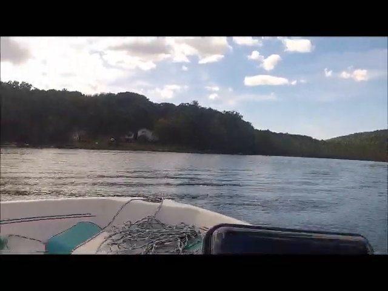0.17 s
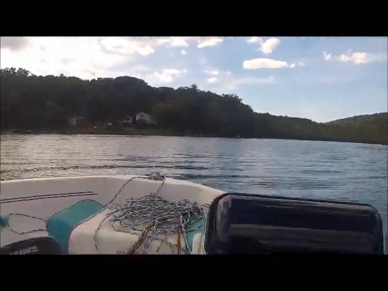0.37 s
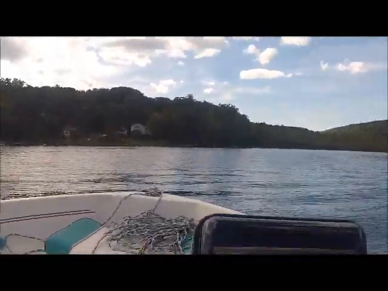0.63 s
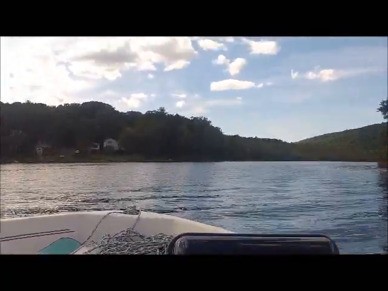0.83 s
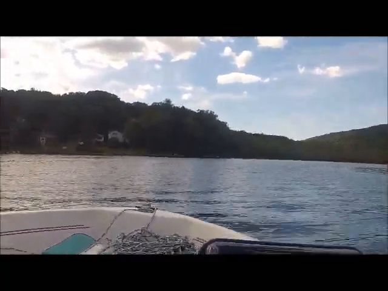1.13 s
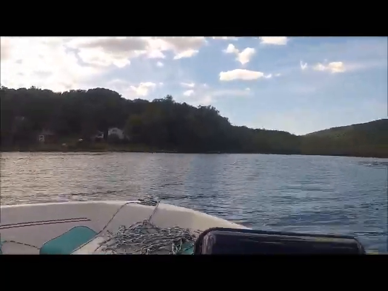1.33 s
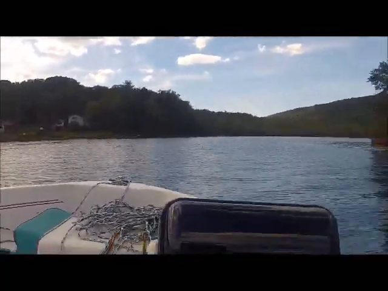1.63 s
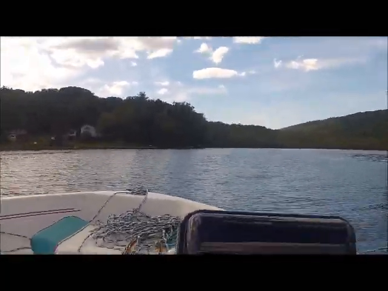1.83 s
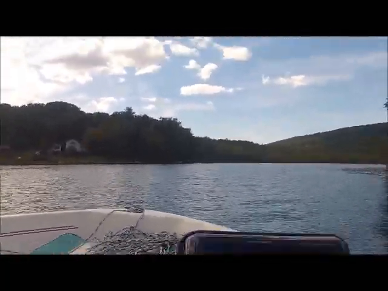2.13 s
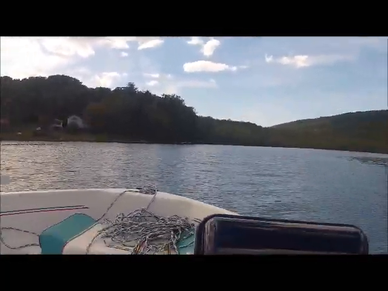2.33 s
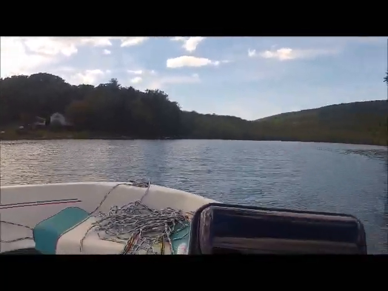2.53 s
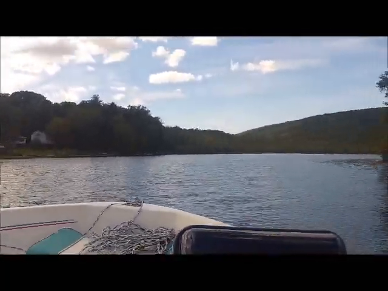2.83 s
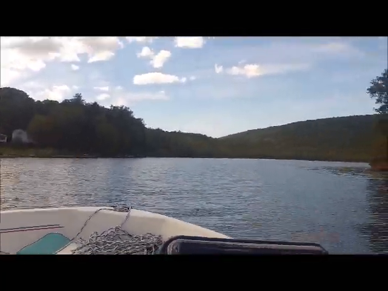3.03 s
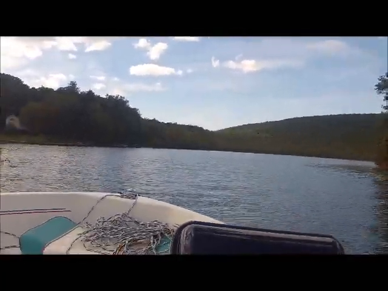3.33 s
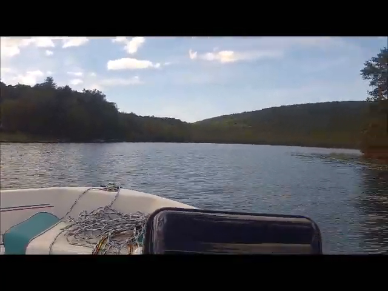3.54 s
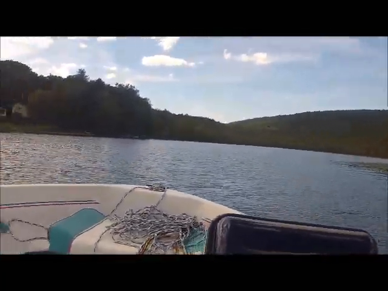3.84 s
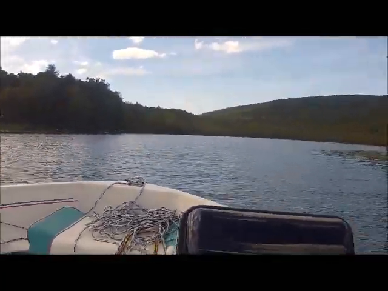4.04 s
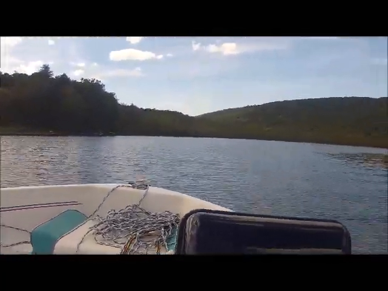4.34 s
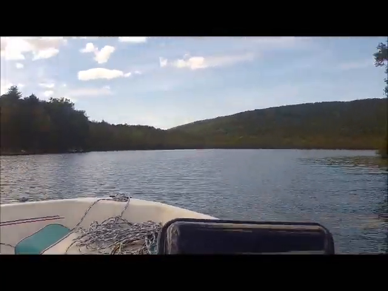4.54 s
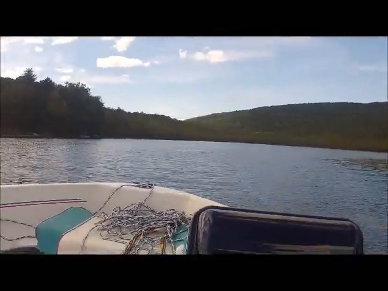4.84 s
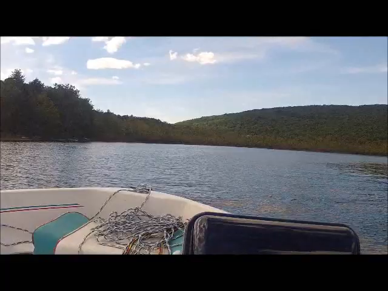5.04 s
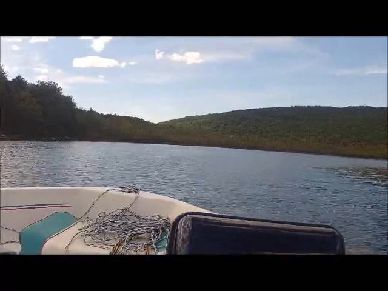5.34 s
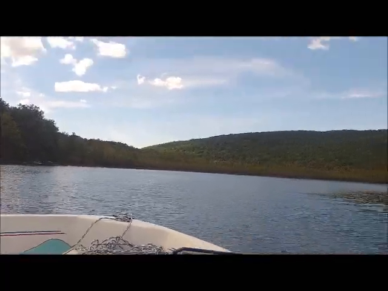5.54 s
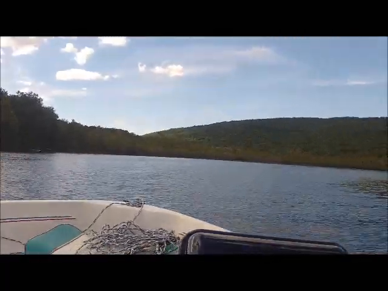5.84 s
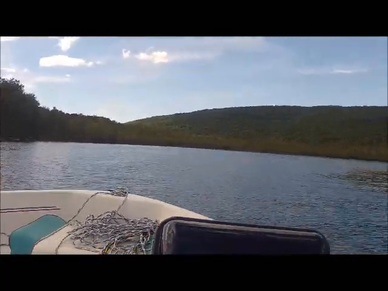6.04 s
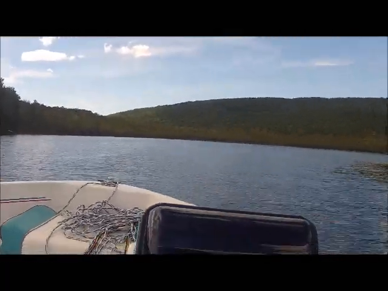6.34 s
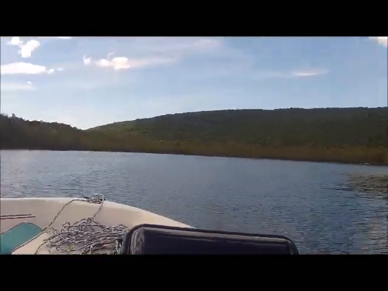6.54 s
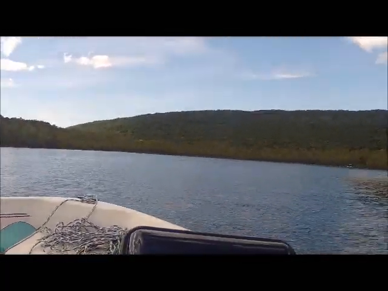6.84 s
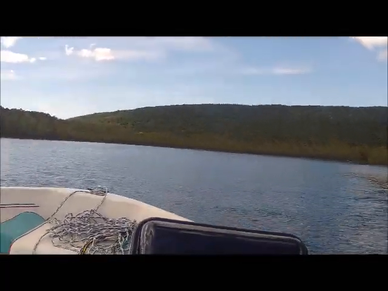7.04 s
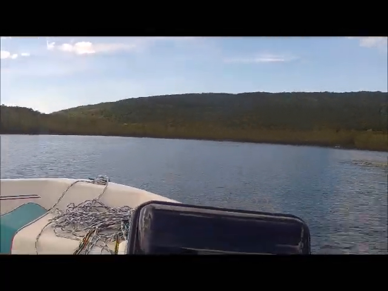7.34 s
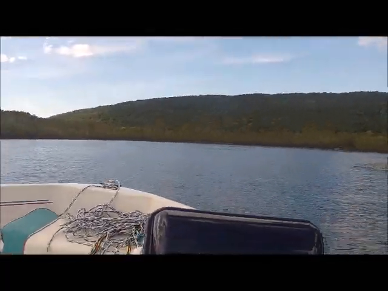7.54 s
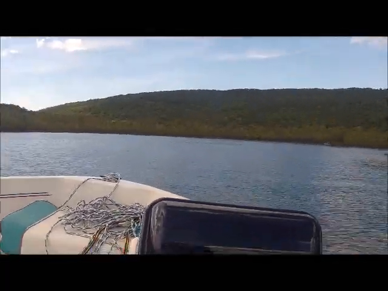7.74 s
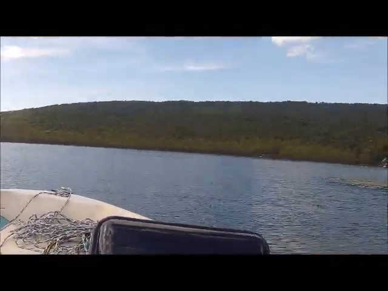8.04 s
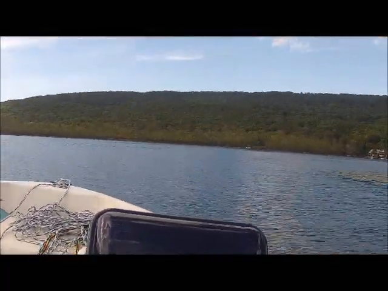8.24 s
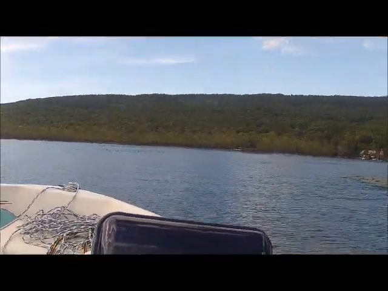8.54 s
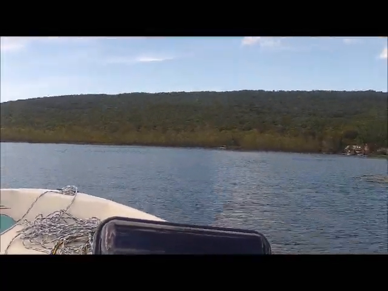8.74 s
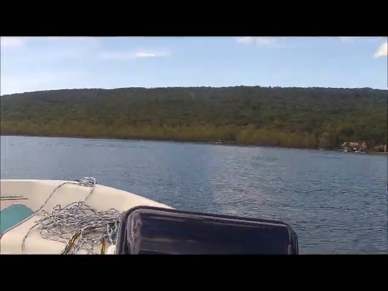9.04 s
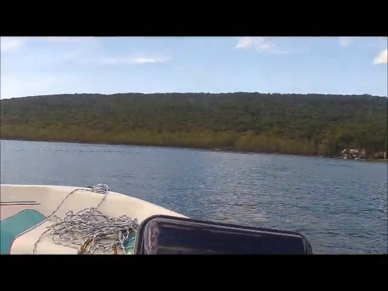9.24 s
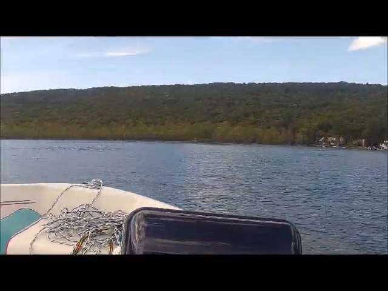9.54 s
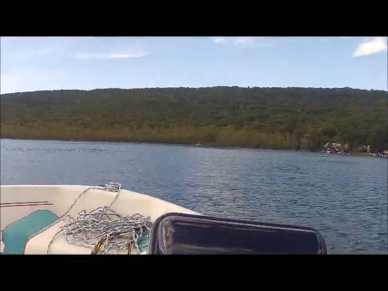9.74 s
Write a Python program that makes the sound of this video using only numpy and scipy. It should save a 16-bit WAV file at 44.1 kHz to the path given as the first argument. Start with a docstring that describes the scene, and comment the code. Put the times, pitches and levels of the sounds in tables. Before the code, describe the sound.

A small two-stroke boat engine drones steadily, heard on board, with exhaust burbling, a loose metal part rattling, hissing spray and low wind buffeting.

```python
"""On board a small boat under way, with its two-stroke engine turning at an almost even speed.
Wind buffets the microphone port and spray hisses: both are coloured noise, the spray with single drops.
A loose part buzzes, ticks and chinks, and clatter rings the resonances of the engine cowl.
Exhaust noise burbles with the crank, under a hum of cosines at multiples of the shaft rate.
The recorder's cheap converter holds each sample, so it mirrors the sound around its sampling rate."""
import sys
import numpy as np
from scipy import signal
from scipy.fft import rfft, irfft, next_fast_len
from scipy.io import wavfile
from scipy.ndimage import uniform_filter1d, map_coordinates

SR = 44100
rng = np.random.default_rng(int(sys.argv[2]) if len(sys.argv) > 2 else 0)


def master(y):
    """Save y as 16-bit WAV."""
    cut = np.clip(np.atleast_2d(y).T, -1, 1)
    pcm = np.round(cut * 32767)  # scale
    wavfile.write(sys.argv[1], SR, pcm.astype(np.int16))


N = 435689


def amp(db):
    """Gain of a level in dB."""
    return 10 ** (np.asarray(db) / 20)


def unit(x):
    """x at rms 1."""
    return x / np.sqrt(np.mean(x ** 2) + 1e-20)


def curves(rows):
    """One value per sample for each column after the time."""
    seconds, *columns = np.transpose(rows)
    t = np.arange(N) / SR
    return [np.interp(t, seconds, column) for column in columns]


def wobble(rate):
    """A smooth random curve through rate knots a second, at most 39."""
    position = np.arange(N) * min(rate, 39) / SR
    return map_coordinates(rng.standard_normal(400), [position], order=3)


def filtered(x, response):
    """x times a complex response of frequency, padded so that tails do not wrap."""
    size = next_fast_len(N + SR // 2)
    spectrum = rfft(x, size) * response(np.fft.rfftfreq(size, 1 / SR))
    return irfft(spectrum, size)[..., :N]


def colour(points):
    """Response through (frequency [Hz], level [dB]) points on a log axis."""
    f, db = np.transpose(points)
    return lambda hz: amp(np.interp(np.log(hz + 1), np.log(f + 1), db))


def resonances(modes):
    """Causal sum of resonances, neighbours in opposite phase."""
    def response(f):
        total = 0
        for k, (centre, width, db) in enumerate(modes):
            damping = 1j * f * width
            total = total + (-1) ** k * amp(db) * damping / (centre ** 2 - f ** 2 + damping)
        return total
    return response


def ticks(rate, spread_db, density):
    """Random impulses of uneven size and either sign, rate a second where density is 1."""
    happens = rng.random(N) < rate * density / SR
    size = np.minimum(rng.exponential(1, N), 3.5)
    sign = np.sign(rng.standard_normal(N))
    return unit(happens * sign * amp(spread_db * size))


def once_a_turn(angle, depth_db, twice_db, lag):
    """Noise that swells at each firing and again at the opposite stroke; lag in radians."""
    swell_db = depth_db * np.cos(angle - lag) + twice_db * np.cos(2 * (angle - lag))
    return rng.standard_normal(N) * amp(swell_db)


def evened(x, share):
    """Noise with a share of its own random swelling taken out."""
    envelope = np.abs(signal.hilbert(x, next_fast_len(N))[:N])
    return unit(x / (envelope + 0.36) ** share)


# Engine speed on the water: (time [s], crankshaft speed [turns/s])
SPEED = [(0.0, 73.24), (1.4, 73.31), (1.6, 73.19), (2.5, 73.21), (2.8, 73.1), (3.0, 73.14), (3.4, 72.98),
         (4.2, 73.13), (4.55, 73.05), (4.8, 73.1), (6.6, 73.11), (7.0, 73.01), (7.55, 72.97), (8.0, 72.65),
         (8.4, 72.82), (8.8, 72.81), (9.15, 72.6), (9.88, 72.63)]


def shaft():
    """Speed in turns a second, and the crank angle in radians with a slight unevenness."""
    speed, = curves(SPEED)
    even_angle = 2 * np.pi * np.cumsum(speed) / SR
    return speed, even_angle + 0.033 * wobble(9) + 0.0077 * wobble(30)


# Rattle level on board between the sharp knocks: (time [s], level [dB])
RATTLE = [(0.0, -45.5), (0.6, -47.5), (1.5, -42), (2.0, -46), (2.2, -40), (3.0, -42.5), (3.35, -40),
          (3.7, -43), (4.7, -41), (5.2, -42), (5.6, -40), (6.0, -42), (6.4, -42.5), (7.0, -41),
          (8.7, -41.5), (9.88, -41)]
# Sharpest knocks of the loose part: (time [s], level [dB])
CHINKS = [(0.115, -41.7), (0.166, -31.5), (0.304, -38), (0.422, -42.9), (0.544, -42), (0.632, -39),
          (0.777, -34), (0.9, -38), (0.968, -41), (1.158, -37), (1.328, -37), (1.577, -35), (1.951, -36),
          (2.221, -34), (2.319, -34), (2.499, -31), (3.393, -37.2), (3.638, -38.6), (3.842, -38),
          (3.997, -33), (4.049, -37), (4.681, -34.5), (5.395, -39.2), (5.488, -38), (5.624, -34),
          (5.762, -37), (6.28, -35), (6.484, -34), (6.936, -39), (7.135, -44.5), (7.193, -42.1),
          (7.312, -40), (7.509, -43), (7.654, -38), (8.221, -35), (8.461, -36), (8.791, -33)]
CHINK_S = 0.0064  # half length of a knock [s]
SWELL_DB, SWELLS_PER_S = 1.63, 9.8  # random swelling of the rattle: depth [dB], knots a second


def shaking():
    """Level of the rattle in dB: a slow drift, random swells and short sharp knocks."""
    t = np.arange(N) / SR
    drift_db, = curves(RATTLE)
    power = amp(drift_db + SWELL_DB * wobble(SWELLS_PER_S)) ** 2
    for s, db in CHINKS:
        near = slice(max(round((s - .05) * SR), 0), round((s + .05) * SR))
        power[near] += amp(db) ** 2 * np.exp(-((t[near] - s) / CHINK_S) ** 2)
    return 10 * np.log10(power)


# Gusts at the microphone port: (time [s], level [dB])
WIND = [(0.0, -31), (0.9, -35), (1.3, -37), (2.0, -31), (2.7, -36.5), (4.6, -33.5), (5.0, -36.5),
        (5.8, -35), (6.6, -32.5), (7.1, -34.5), (8.9, -36.5), (9.5, -42), (9.88, -39)]
# Tone of the wind lumps before the low-pass: (frequency [Hz], relative level [dB per Hz])
BUFFET = [(15, -30), (24, -17), (38, 2.5), (50, 2), (65, -17), (110, -16.5), (300, -58)]


def buffet():
    """Wind lumps on the microphone port: gusty noise kept below 140 Hz."""
    lumps = unit(filtered(rng.standard_normal(N), colour(BUFFET)))
    gust_db = curves(WIND)[0] + 1.7 * wobble(3.95)
    return filtered(amp(gust_db) * evened(lumps, share=0.34), lambda hz: hz < 140)


# Drift of the spray at the microphone, which the cowl follows: (time [s], level [dB])
TREBLE = [(0.0, -45), (1.0, -45), (1.95, -44.5), (2.2, -44.5), (3.4, -44), (4.1, -44.5), (4.7, -44),
          (5.6, -44), (6.2, -44.5), (8.8, -43), (9.88, -43)]
# Tone of the thrown water: (frequency [Hz], relative level [dB per Hz])
SPRAY = [(900, -25.5), (2000, -4), (2900, -5), (3150, 3), (3450, -1), (3650, 3), (3850, -2), (4100, -4.5),
         (4700, -8), (5350, -6), (5600, -11.5), (5800, -17), (5950, -35)]


def spray(angle, shake_db, treble_db):
    """Hiss of thrown water with single drops, pushed a little by each firing and by the boat's shaking."""
    drops = 0.34 * ticks(rate=900, spread_db=3.0, density=amp(3.2 * wobble(20)))
    hiss = once_a_turn(angle, depth_db=1.13, twice_db=0.7, lag=2.5) * amp(0.41 * wobble(30))
    level_db = treble_db + 0.6 * wobble(8) + 0.11 * shake_db
    return amp(level_db) * unit(filtered(hiss + drops, colour(SPRAY)))


def chinks(count, low_hz, high_hz, life, spread_db):
    """Short rings in clumps, drawn from count candidates, each at its own pitch and sliding a little."""
    when, pitch, size, slide, keep = rng.random((count, 5)).T[..., None]
    start = (when * N).astype(int)
    t = np.arange(SR // 40) / SR
    swell = t / life * np.exp(-t / life)  # life in seconds
    start_hz = low_hz + pitch * (high_hz - low_hz)
    tone = np.sin(2 * np.pi * start_hz * t * (1 + 3 * (slide - .5) * t))
    clump = keep < amp(5 * wobble(34) - 8)[start]
    loudness = amp(spread_db * np.minimum(-np.log(size), 3.5))
    rings = clump * loudness * swell * tone
    places = start + np.arange(len(t))
    return unit(np.bincount(places.ravel(), rings.ravel(), N + len(t))[:N])


# Tone of the loose part on board: (frequency [Hz], relative level [dB per Hz])
LOOSE_PART = [(1500, -29), (2080, -9), (2190, 9.5), (2290, 8.5), (2400, 5.5), (2500, 12), (2560, 9.5),
              (2650, 1), (2760, 0.5), (2900, -24), (3500, -32)]


def rattle(level_db):
    """Loose metal parts tick and chink against each other over their own steady buzz."""
    knocks = ticks(rate=350, spread_db=2.5, density=amp(5 * wobble(30)))
    buzz = unit(rng.standard_normal(N) + 0.9 * knocks)
    rings = chinks(count=3000, low_hz=1824, high_hz=3028, life=0.0013, spread_db=1.5)
    chatter = filtered(buzz + 0.17 * rings, colour(LOOSE_PART))
    # the shaking alone sets the slow swells
    slow_level = np.sqrt(np.abs(uniform_filter1d(chatter ** 2, size=SR // 10)))
    return amp(level_db) * unit(chatter / slow_level)


# Ringing of the engine cover: (frequency [Hz], width [Hz], relative level [dB])
COWL = [(1090, 260, -16), (1242, 163, -4.5), (1410, 300, -20), (1470, 280, -12), (1754, 161, 8),
        (1902, 210, 5.5)]
COWL_DB, COWL_FOLLOWS = -38, 1.3  # mean level [dB]; dB for each dB of the spray's drift


def cowl(angle, shake_db, treble_db):
    """Piston and gear clatter ringing in the engine cover, a little louder when the boat shakes."""
    clatter = once_a_turn(angle, depth_db=1.5, twice_db=3.0, lag=1.34)
    knocks = clatter * amp(0.68 * wobble(24) + 0.18 * shake_db)
    drift_db = treble_db - treble_db.mean()
    level_db = COWL_DB + COWL_FOLLOWS * drift_db + 0.49 * wobble(7)
    return amp(level_db) * unit(filtered(knocks, resonances(COWL)))


# Tone of the exhaust in the water: (frequency [Hz], relative level [dB per Hz])
BURBLE = [(30, -36), (60, 8), (100, -1), (180, -4), (260, -6.5), (330, -10), (410, -10.5), (480, -16.5),
          (750, -22), (1000, -22), (1400, -22.5), (2500, -40.5)]


def burble(angle):
    """Exhaust gas bubbling out under water: low noise that pulses with the crank."""
    gas = once_a_turn(angle, depth_db=0.5, twice_db=1.0, lag=0.29) * amp(0.92 * wobble(14))
    return amp(-34.5 + 0.12 * wobble(3.06)) * unit(filtered(gas, colour(BURBLE)))


# Engine orders as heard on board, relative to the hum level: (multiple of the shaft rate,
# level at highest speed [dB], level at middle speed [dB], level at lowest speed [dB])
FIRING = [(1, 0, 0, 0), (2, -11, -11, -10), (3, -26, -22, -21), (4, -14, -16, -16), (5, -17, -16, -18),
          (6, -14, -16, -18), (7, -31, -30, -30), (8, -33, -32, -34), (9, -36, -35, -34),
          (10, -41, -45, -36), (11, -39, -41, -39), (12, -48, -49, -43), (13, -40, -41, -38),
          (14, -42, -43, -42), (15, -40, -38, -37), (16, -39, -39, -35), (17, -27, -26, -25),
          (18, -34, -32, -34), (19, -42, -46, -45), (20, -31, -31, -33), (21, -32, -31, -30),
          (22, -29, -30, -30), (23, -30, -31, -33), (24, -21, -20, -18), (25, -41, -41, -38),
          (26, -33, -29, -20), (27, -36, -33, -33)]
# Speeds those levels belong to, lowest, middle and highest: (crankshaft speed [turns/s])
SPEED_STEPS = [72.65, 73.08, 73.24]
HUM_DB, HUM_DB_PER_TURN = -25.5, 2  # level at the middle speed [dB]; dB for each turn a second more


def hum(speed, angle):
    """Firing orders; their balance shifts as the speed slides past hull and cowl resonances."""
    total = np.zeros(N)
    for k, high_db, middle_db, low_db in FIRING:
        level_db = np.interp(speed, SPEED_STEPS, [low_db, middle_db, high_db])
        waver_db = .35 * np.sqrt(k) * wobble(5)  # higher orders are less steady
        # the cowl's many paths scramble the high orders
        scatter = rng.uniform(0, 2 * np.pi) * (k > 6)
        # overtones are inverted; the hull's answer is shifted in the turn
        lag = np.pi * (k > 1) + 1.205 * k * (k > 2)
        total += amp(level_db + waver_db) * np.cos(k * angle + lag + scatter)
    hum_db = HUM_DB + HUM_DB_PER_TURN * (speed - SPEED_STEPS[1])
    return amp(hum_db) * np.sqrt(2) * total


def scene():
    """All sources at one microphone on board."""
    speed, angle = shaft()
    rattle_db = shaking()
    treble_db, = curves(TREBLE)
    jolts_db = wobble(33)  # quick jolts of the hull reach rattle, cowl and water at once
    # what shakes the loose parts also shakes cowl and water
    shake_db = rattle_db - rattle_db.mean() + 4 * jolts_db
    around = buffet() + spray(angle, shake_db, treble_db) + rattle(rattle_db + 0.52 * jolts_db)
    engine = cowl(angle, shake_db, treble_db) + burble(angle) + hum(speed, angle)
    return (around + engine)[None]


HOLD_HZ, TOP_HZ = 12000, 15350  # converter's sampling rate [Hz]; upper limit of the sound [Hz]


def record(dry):
    """Sampling at a low rate mirrors the band around that rate; holding each sample gives the sinc slope."""
    band = filtered(dry, lambda hz: hz < HOLD_HZ / 2)
    sampled = band * (1 + 2 * np.cos(2 * np.pi * HOLD_HZ * np.arange(N) / SR))
    return filtered(sampled, lambda hz: np.sinc(hz / HOLD_HZ) * (hz < TOP_HZ))


dry = scene()
out = record(dry)
master(out)
```